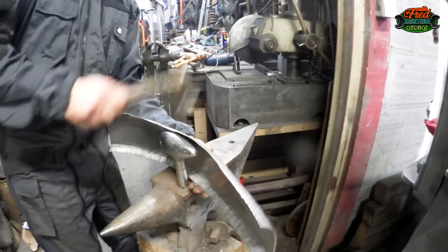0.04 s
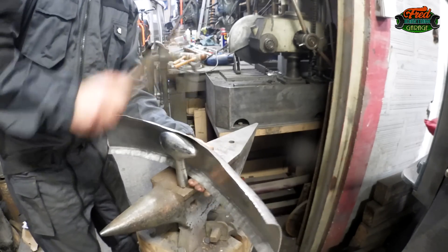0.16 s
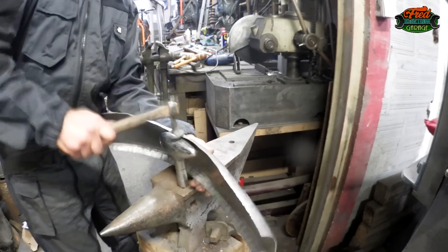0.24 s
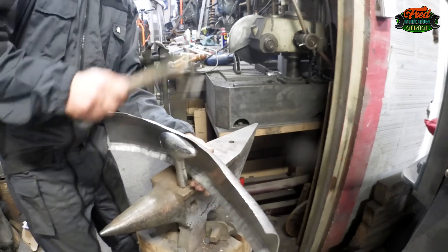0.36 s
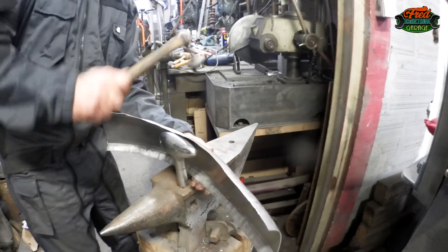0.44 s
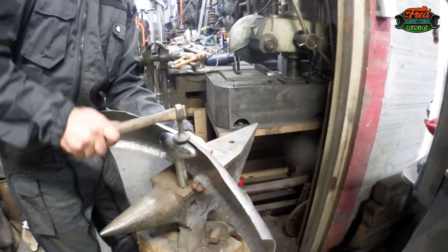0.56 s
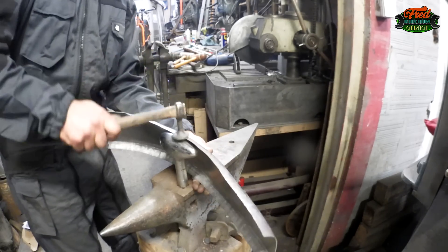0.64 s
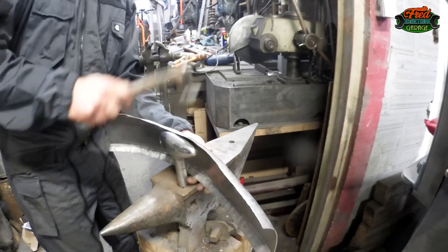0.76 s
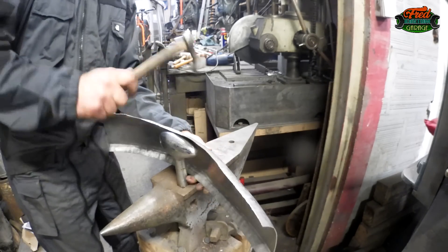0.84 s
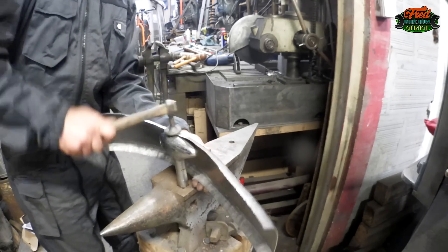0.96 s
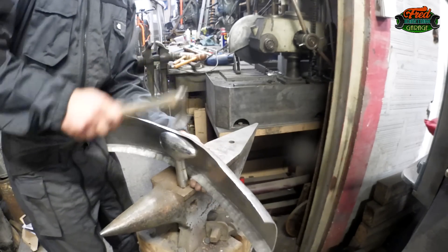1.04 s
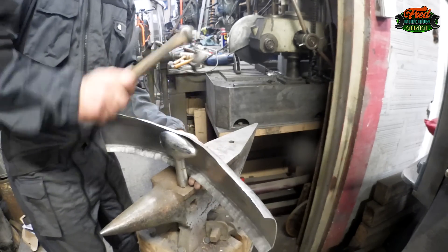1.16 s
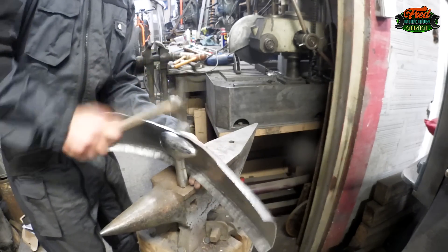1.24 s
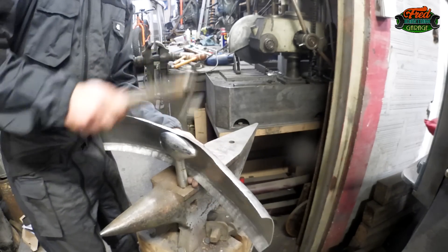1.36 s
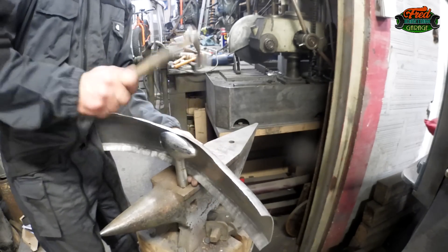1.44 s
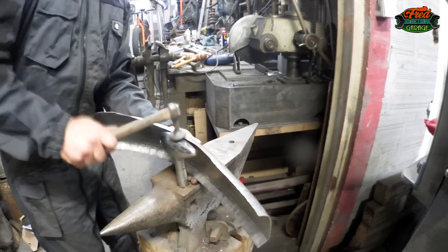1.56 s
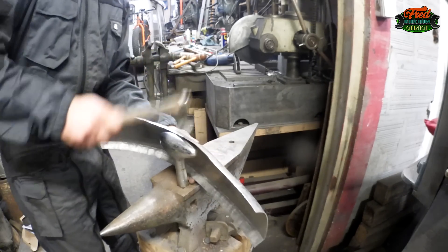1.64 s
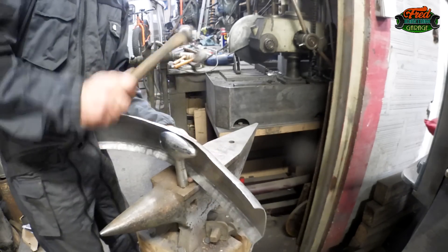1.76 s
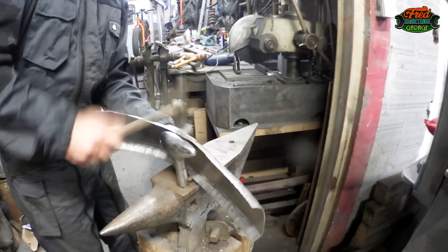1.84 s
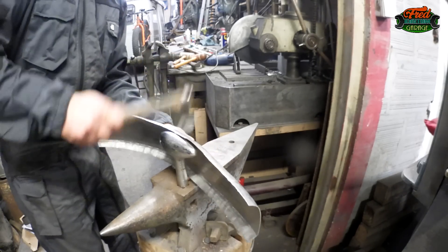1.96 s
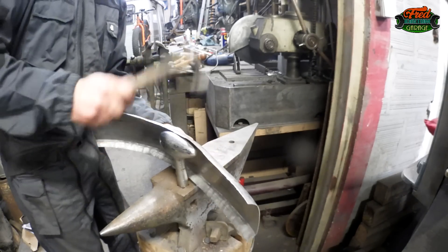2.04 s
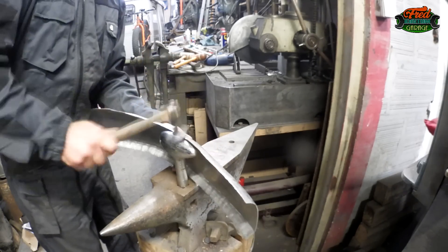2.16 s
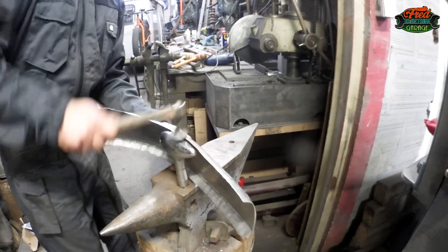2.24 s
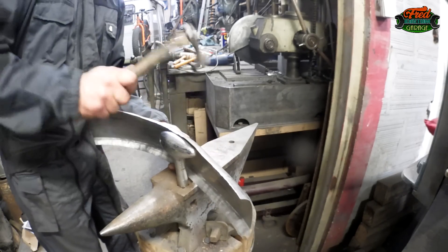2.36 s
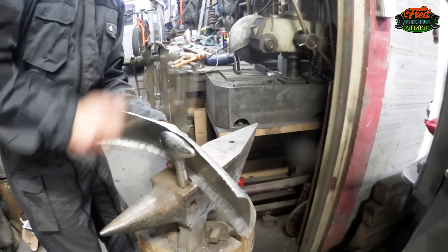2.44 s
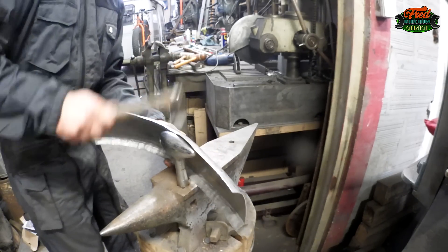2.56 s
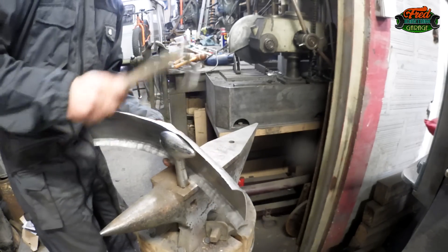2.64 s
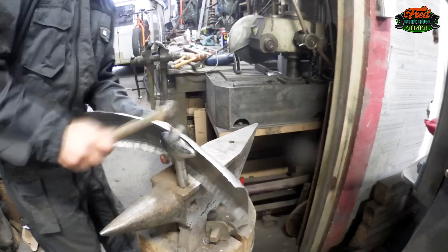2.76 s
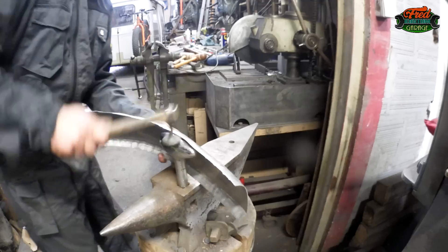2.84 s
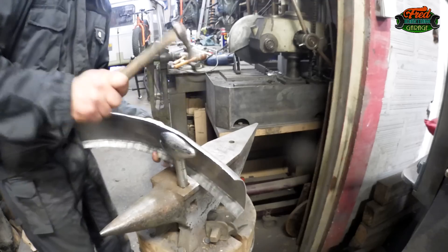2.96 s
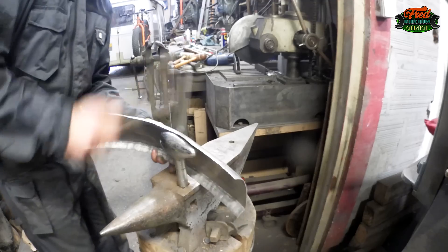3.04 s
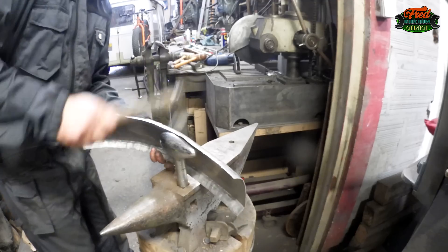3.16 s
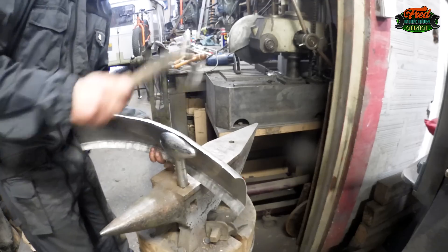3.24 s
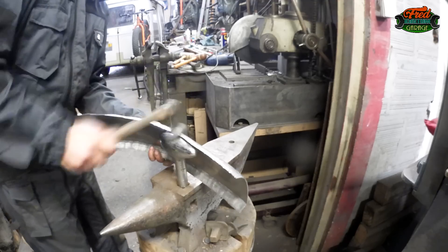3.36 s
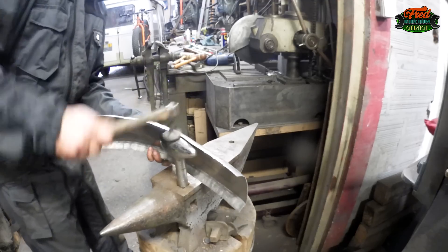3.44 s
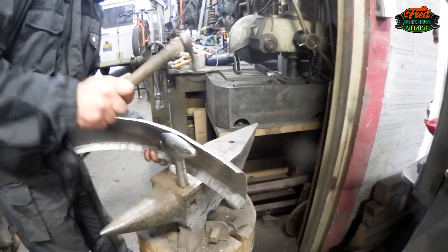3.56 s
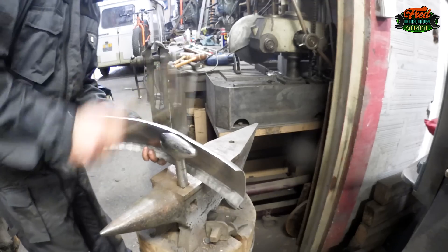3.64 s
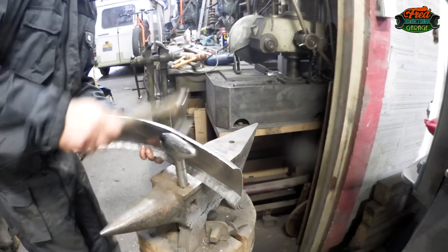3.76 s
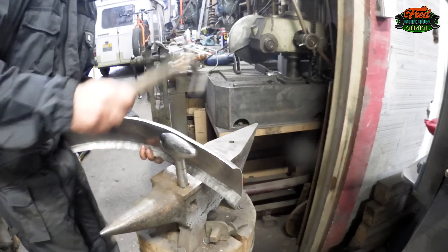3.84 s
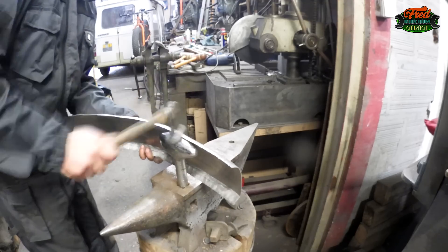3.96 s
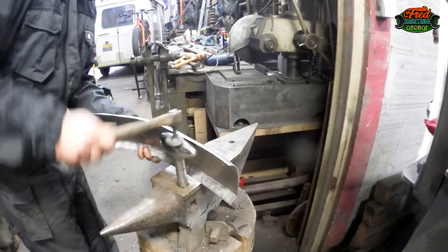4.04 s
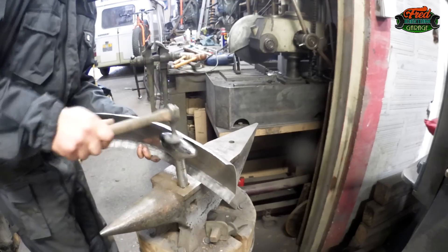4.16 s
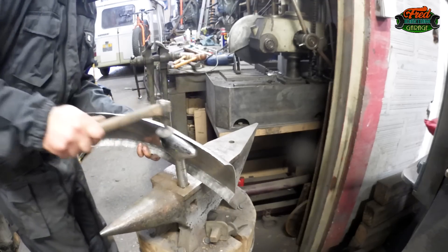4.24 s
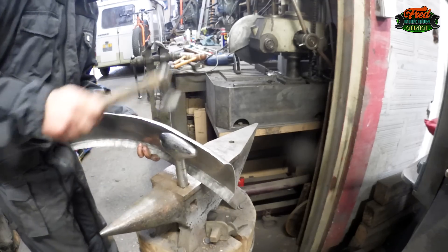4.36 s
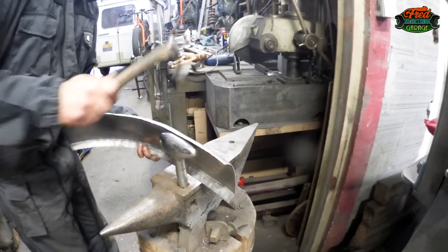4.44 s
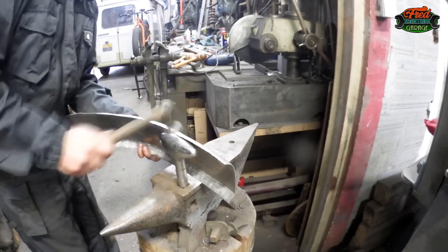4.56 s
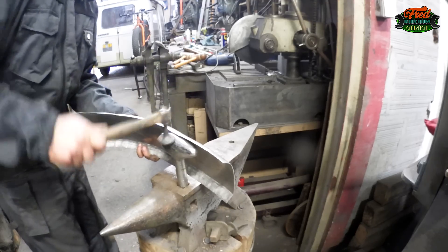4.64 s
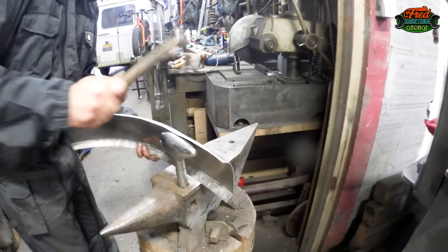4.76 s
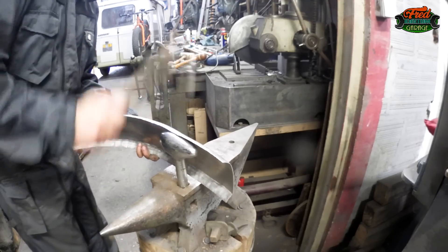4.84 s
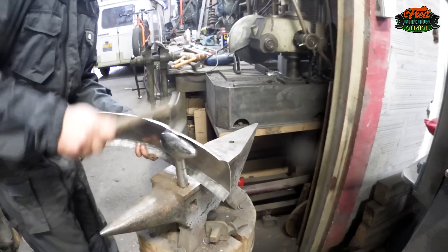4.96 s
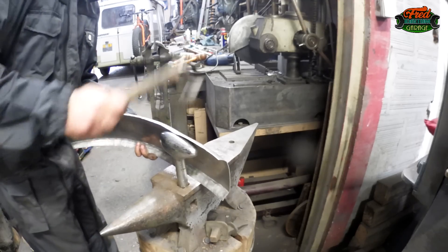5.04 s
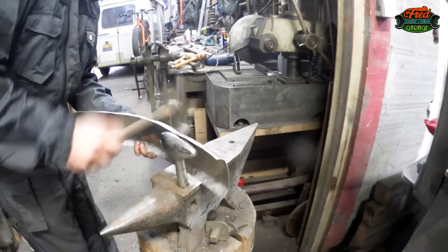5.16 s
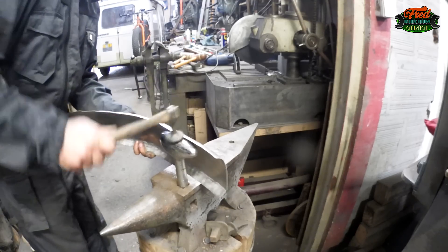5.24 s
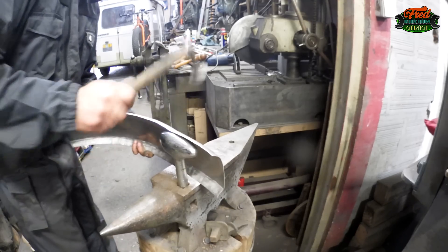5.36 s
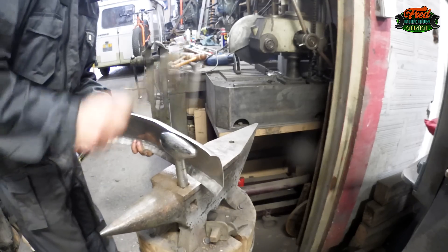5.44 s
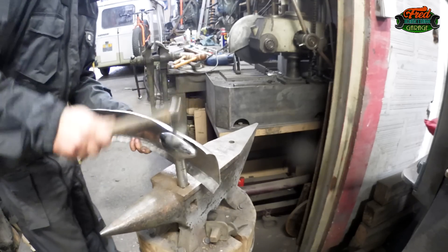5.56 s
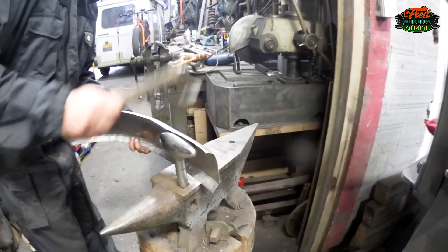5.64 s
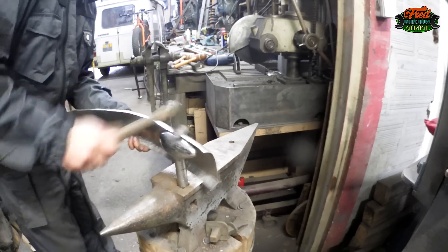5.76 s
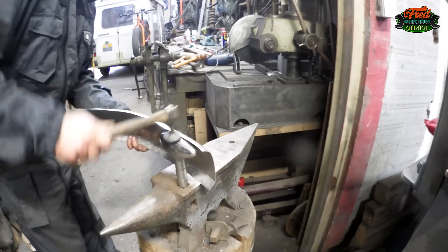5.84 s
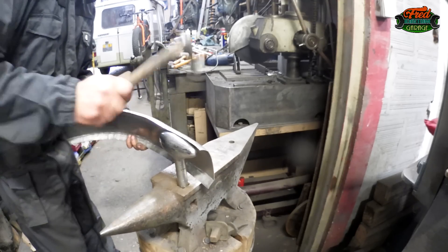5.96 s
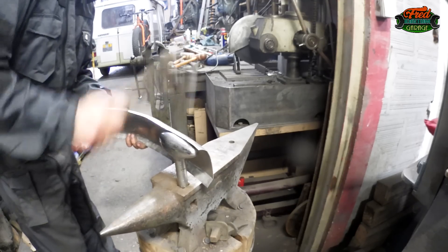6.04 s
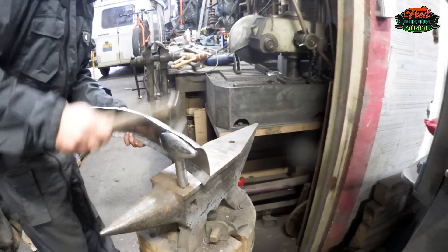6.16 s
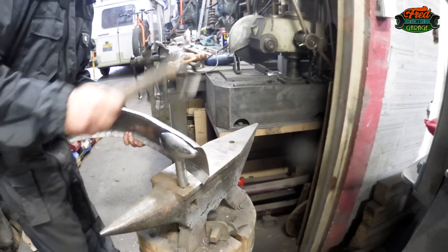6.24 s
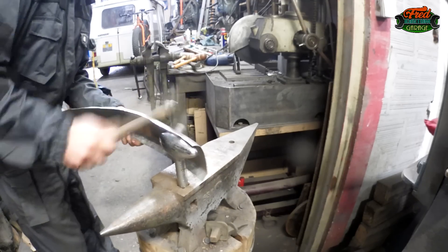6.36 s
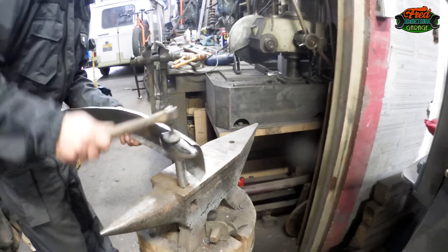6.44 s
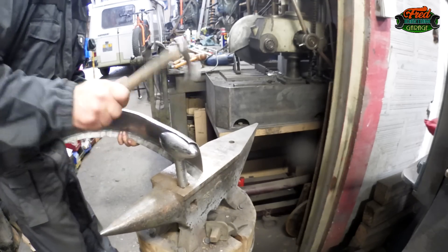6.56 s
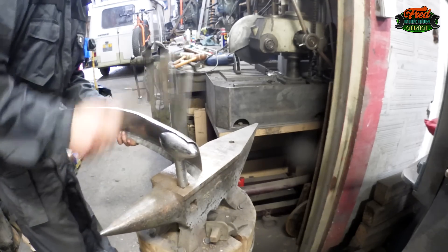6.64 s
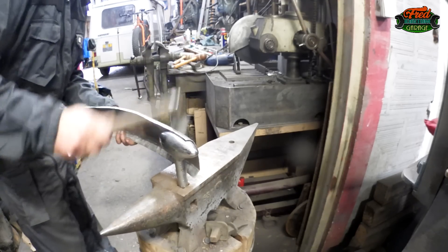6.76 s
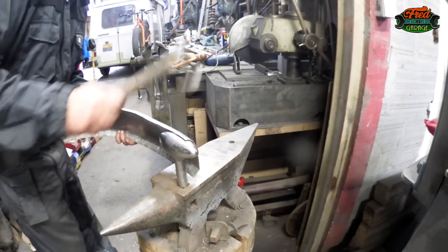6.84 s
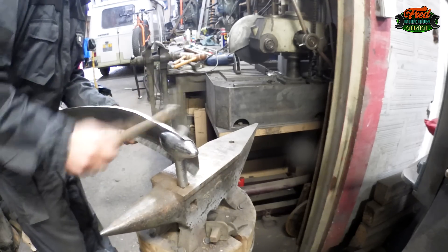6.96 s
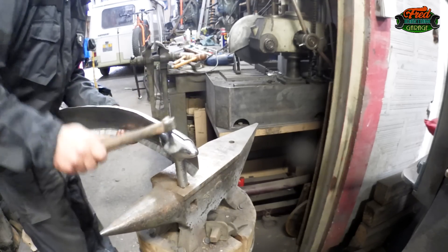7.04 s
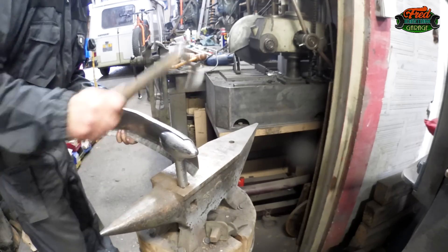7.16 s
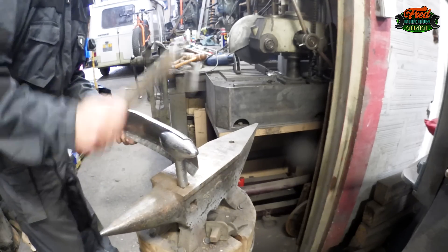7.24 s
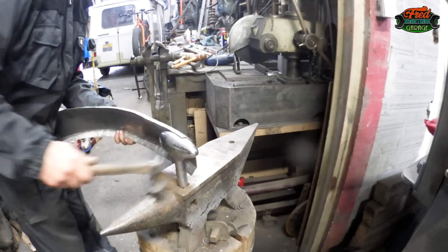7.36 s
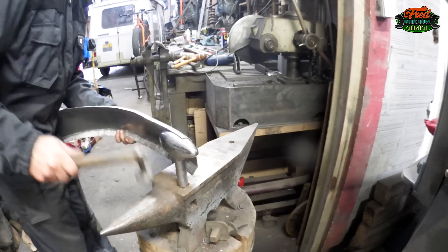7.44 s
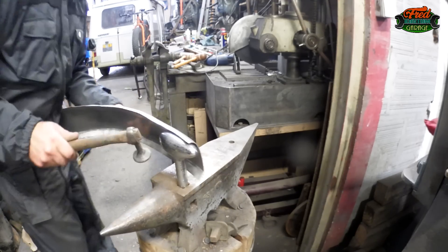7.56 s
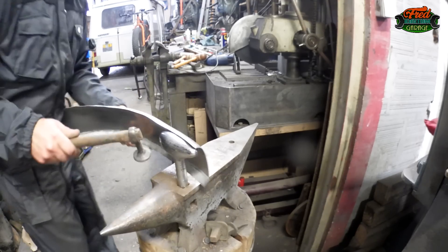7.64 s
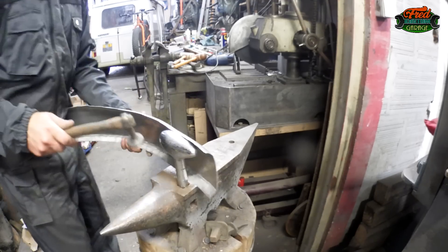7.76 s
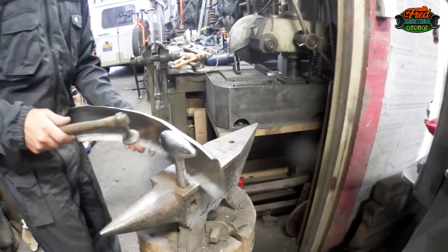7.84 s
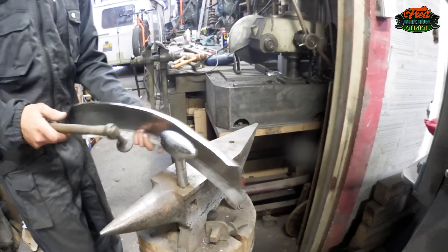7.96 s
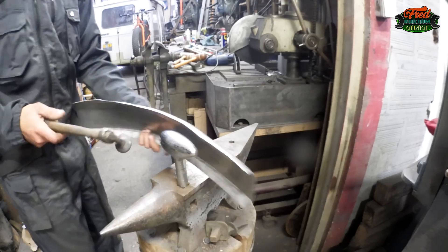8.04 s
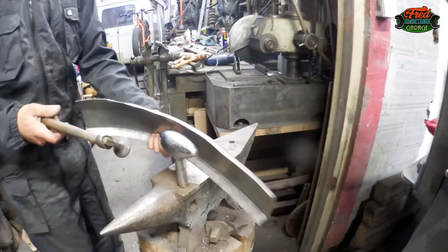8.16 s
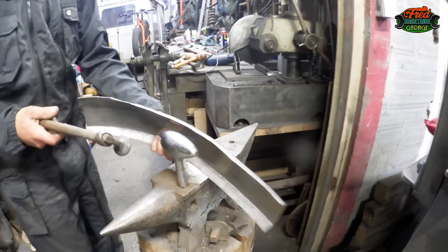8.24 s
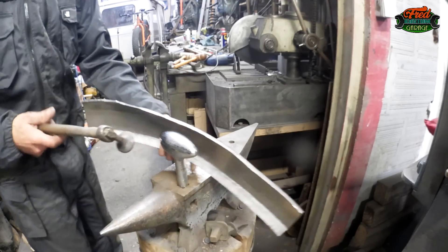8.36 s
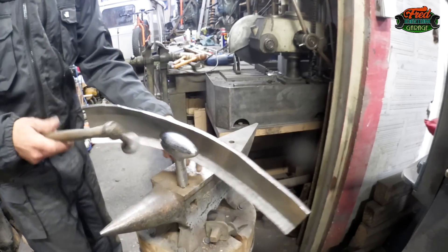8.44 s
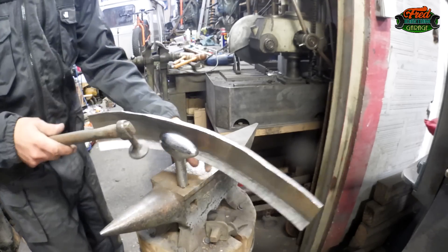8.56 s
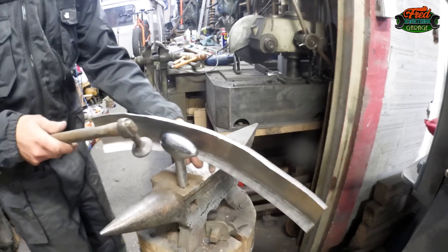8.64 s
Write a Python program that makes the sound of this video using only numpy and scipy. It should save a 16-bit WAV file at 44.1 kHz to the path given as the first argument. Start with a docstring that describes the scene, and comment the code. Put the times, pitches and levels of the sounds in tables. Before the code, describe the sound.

Rapid hammer blows clang on a hand-damped curved steel sheet over an anvil stake, each rattling briefly, then soft knocks and faint scraping at the end.

```python
"""A curved steel panel is hammered over a stake on an anvil, about three blows a second, in a small workshop.
Each blow rings the hand-damped sheet as a crowd of decaying sines, and the sheet chatters back on the stake.
At the end the panel slides over the stake, rung by tiny noise catches, and knocks on it lightly.
Reflections off cluttered walls and faint air noise surround it; the close stereo microphone overloads."""
import sys
import numpy as np
from scipy import signal
from scipy.fft import rfft, irfft
from scipy.io import wavfile

SR = 44100
rng = np.random.default_rng(int(sys.argv[2]) if len(sys.argv) > 2 else 0)


def unload_wav(signal):
    """Save mono or channel-first audio to the path in sys.argv[1] as 16-bit WAV at rate SR, clipped to [-1, 1]."""
    wavfile.write(
        sys.argv[1],
        SR,
        np.round(np.clip(np.atleast_2d(signal).T, -1, 1) * 32767).astype(np.int16),
    )


N = 383669  # samples, 8.7 s
LEAD = SR // 4  # samples of run-up before time zero
RING_TIME = np.arange(SR // 4) / SR  # s, the span of one ring

# the sheet's outstanding modes: f/Hz, relative level/dB
OUTSTANDING_MODES = [(856, -14.5), (1082, -5.5), (1263, -10.5), (1500, -13.5), (1722, -3.5), (1875, -13),
                     (2064, -11), (2252, -9), (2702, -10), (3094, -7), (3250, -8.5), (3777, -0.5),
                     (3963, 1.5), (4264, -7), (4479, -10.5), (4705, -14)]


def undb(db):
    """Decibels to gain."""
    return 10 ** (np.asarray(db) / 20)


def at(points, hz):
    """Read (Hz, value) points on a log-frequency axis."""
    f, value = np.transpose(points)
    return np.interp(np.log(hz + 1e-3), np.log(f), value)


def unit(x):
    """Scale to rms 1."""
    return x / np.sqrt(np.mean(x ** 2))


def decay(t, t60):
    """Exponential fall of 60 dB in t60 seconds."""
    return np.exp(-np.log(1000) * t / t60)


def highpass(x, order, hz):
    """Butterworth filter that removes the sound below hz."""
    return signal.sosfilt(signal.butter(order, hz, "high", fs=SR, output="sos"), x)


def colour(x, points):
    """Causal minimum-phase filter with the given (Hz, dB) response."""
    log_gain = np.log(undb(at(points, np.fft.rfftfreq(2048, 1 / SR))))
    cepstrum = irfft(log_gain)
    # folding the cepstrum forward makes the response causal
    cepstrum[1:1024] *= 2
    cepstrum[1025:] = 0
    response = irfft(np.exp(rfft(cepstrum)))
    return signal.fftconvolve(x, response[None], axes=1)[:, :x.shape[1]]


def add(track, s, sound):
    """Mix a sound into a track that starts LEAD samples early."""
    i = LEAD + int(s * SR)
    part = sound[:, :track.shape[1] - i]
    track[:, i:i + part.shape[1]] += part


def rings(hz, t60):
    """One decaying sine per mode."""
    hz, t60, t = (np.float32(v) for v in (hz, t60, RING_TIME))
    sines = np.sin(np.float32(2 * np.pi) * hz[:, None] * t)
    return sines * np.exp(np.float32(-np.log(1000)) * t / t60[:, None])


def strike(shapes, gains, spread):
    """Every contact drives the modes with its own strengths and signs, a little different towards each ear."""
    common, side = rng.standard_normal((2, len(gains)))
    weights = gains * (common + spread * side * np.array([[1], [-1]]))
    return np.float32(weights) @ shapes


def panel(lowest_hz=170):
    """Blows, chatter and handling all ring the same sheet, which is too thin to radiate much bass."""
    modes = sheet_modes()
    return highpass(hammering(*modes) + handling(*modes), 2, lowest_hz)


def sheet_modes(count=1000, t60_1k=0.14, damping_slope=0.17, modes_db=-17):
    """Pitches, strengths and rings of the sheet; a plate's modes lie evenly dense in frequency."""
    # how strongly the crowded modes sound: f/Hz, relative level/dB
    crowd_levels = [(150, -23.5), (300, -12.5), (600, -7.5), (850, -1.5), (1100, 3), (1500, 3.5),
                    (2300, 10), (2900, 6), (3150, 11), (3550, 5), (4100, 12.5), (5000, 5), (6500, -0.5),
                    (8500, -10.5)]
    crowd_hz = 120 + 8300 * (np.arange(count) + rng.random(count)) / count
    crowd = undb(at(crowd_levels, crowd_hz))
    mode_hz, mode_db = np.transpose(OUTSTANDING_MODES)
    hz = np.r_[crowd_hz, mode_hz]
    gains = np.r_[crowd / np.linalg.norm(crowd), undb(mode_db + modes_db)]
    # the holding hand damps every mode, the high ones a little faster
    t60 = t60_1k * (hz / 1000) ** -damping_slope
    return hz, gains, rings(hz, t60)


def hammering(hz, gains, shapes, spread=0.38, blow_db=.5, grip_shift=.012):
    """Each blow and its bounces ring the sheet with the colour of the struck spot."""
    # hammer blows: t/s, relative force level/dB, relative hollow body level/dB, relative bright clang level/dB,
    # struck spot f/Hz, wait until the sheet slaps back on the stake t/s, slap level against its blow/dB
    blows = [(-.05, -0.5, 5, -1.5, 1195, 0.029, -9), (0.2493, -1.5, 3.5, 1.5, 1320, 0.035, -7),
             (0.5456, 1.5, 0, -0.5, 1098, 0.034, -5.5), (.9613, 0, 5, 1.5, 1043, 0.031, -3),
             (1.279, 1.6, 0, 2.5, 1104, 0.028, -8), (1.5794, -3, -0.7, 2.5, 1565, 0.033, -5),
             (1.884, -1, 1.3, 1, 1267, 0.028, -13), (2.1954, 1, 1.1, 5.5, 956, 0.023, -11.5),
             (2.5006, 3, 1, 1.5, 1068, 0.023, -9), (2.8044, 2, 0, 3, 1615, 0.033, -12.5),
             (3.1015, 2.6, -3.2, -0.9, 1491, 0.022, -8.5), (3.407, 0.8, -1, 2, 1500, 0.023, -15.5),
             (3.7032, -1.7, -1.7, -0.5, 1584, 0.023, -4.5), (4.0039, 0.5, 0.5, 1.5, 1142, .026, -9.5),
             (4.6072, 1.5, -1.9, -1.5, 1487, 0.032, -9), (4.9225, 1.1, -6, -5.5, 1330, 0.015, -12.5),
             (5.2213, -0.26, -0.5, -0.8, 1093, .025, -11), (5.5194, -0.5, -1.1, 2.5, 1064, 0.026, -11.5),
             (5.8131, 0.2, -0.2, -1.1, 1390, 0.028, -8), (6.1179, 0.3, -1, 0.5, 1160, .012, -21),
             (6.4186, .7, 0, -1.5, 1121, 0.0087, -7), (6.7145, 2, -1.5, -1.8, 1410, 0.013, -15.5),
             (7.019, -2.5, 0.2, -3.8, 1495, .011, -3.5), (7.3367, -6.5, 0, -3, 1046, 0.027, -10)]
    spot_db, spot_t60_s = -16, 0.086  # the struck spot's own ring
    out = np.zeros((2, LEAD + N))
    chance = rng.standard_normal((len(blows), 2))
    for blow, (grip, jitter) in zip(blows, chance):
        s, force_db, body_db, clang_db, spot_hz, slap_s, slap_db = blow
        spot = undb(spot_db) * rings([spot_hz], [spot_t60_s])
        tone = spot_tone(hz, body_db, clang_db)
        # grip and bending retune the sheet a little from blow to blow
        retuned = RING_TIME * (1 + grip_shift * grip)
        for delay, db in contacts(slap_s, slap_db, jitter):
            ears = strike(shapes, gains * tone, spread)
            ring = np.array([np.interp(retuned, RING_TIME, ear) for ear in ears])
            add(out, s + delay, undb(blow_db + force_db + db) * (ring + spot + crack()))
    return out


def spot_tone(hz, body_db, clang_db, patchy_db=2.5, uneven_db=1.5, count=48):
    """The hammer lands near the nodes of some groups of modes and the crests of others."""
    db = at([(1200, body_db), (2000, 0), (3400, 0), (4200, clang_db), (5500, 0)], hz)
    patches = np.interp(hz, np.linspace(hz.min(), hz.max(), count), rng.standard_normal(count))
    unevenness_db = patchy_db * patches + uneven_db * rng.standard_normal(len(hz))
    return undb(db) * unit(undb(unevenness_db))


def contacts(slap_s, slap_db, jitter, count=3):
    """One blow as (delay s, dB): the hammer, a rattle under its face, and the sheet bouncing on the stake."""
    rattle_s, rattle_scatter_s, rattle_db = .011, .002, -10
    # after the first slap each bounce comes sooner and weaker
    gap_ratio, loss_db = .6, -9.5
    bounce = np.arange(count)
    delays = slap_s * np.cumsum(gap_ratio ** bounce)
    rattle = (abs(rattle_s + rattle_scatter_s * jitter), rattle_db)
    return [(0, 0), rattle, *zip(delays, slap_db + loss_db * bounce)]


def crack(level_db=-27, t60=0.049):
    """Steel meeting steel spits a brief burst of treble."""
    burst = highpass(rng.standard_normal(len(RING_TIME)), 2, 7000)
    return undb(level_db) * burst * decay(RING_TIME, t60)


def workshop(x, room_db=-14, build_s=0.0096):
    """Dense reflections off cluttered walls build up quickly; the treble dies first."""
    # colour of the wall reflections: f/Hz, relative level/dB
    wall_colour = [(100, -12.5), (400, -2), (1200, -3), (4000, -5), (7000, 2), (10000, -2.5)]
    # how long the reflections last: f/Hz, t60/s
    wall_t60 = [(150, 0.53), (1000, 0.52), (2500, 0.59), (5000, 0.5), (10000, 0.24)]
    t = np.arange(SR) / SR
    hz = np.fft.rfftfreq(SR, 1 / SR)
    noise, tail = rfft(rng.standard_normal((2, SR))), 0
    centres = [f for f, _ in wall_t60]
    # overlapping bands, each dying at its own rate
    for (_, t60), own in zip(wall_t60, np.eye(len(centres))):
        band = at(list(zip(centres, own)), hz)
        tail = tail + irfft(noise * band, SR) * decay(t, t60)
    tail = unit(tail * (1 - np.exp(-t / build_s))) / np.sqrt(SR)
    reflections = signal.fftconvolve(x, colour(tail, wall_colour), axes=1)[:, :x.shape[1]]
    return undb(room_db) * reflections


def background(width=0.66, level_db=-72):
    """Faint steady air noise in the shop, partly different at each ear."""
    # spectrum of the air noise: f/Hz, relative level per Hz/dB
    air = [(40, -12), (100, 3), (200, 4), (400, 4.5), (700, -1.5), (1500, -6), (4000, -8), (7500, -21.5),
           (15000, -25.5)]
    mid, side = rng.standard_normal((2, N))
    stereo = mid + width * side * np.array([[1], [-1]])
    return undb(level_db) * unit(colour(stereo, air))


def sliding(response, catches_per_s=2500):
    """Tiny catches of uneven size ring the sheet as it is dragged."""
    # the panel sliding over the stake: t/s, relative level/dB
    slide = [(7.45, -43.5), (7.6, -53.5), (7.8, -49), (7.96, -62), (8.18, -52.5), (8.22, -78), (8.56, -78),
             (8.62, -66.5), (8.7, -63.5)]
    t = np.arange(-LEAD, N) / SR
    catches = rng.standard_normal(len(t)) * (rng.random(len(t)) < catches_per_s / SR)
    rub = signal.fftconvolve(catches[None], response, axes=1)[:, :len(t)]
    level_db = np.interp(t, *np.transpose(slide), left=-np.inf)  # silent before the slide
    return unit(rub) * undb(level_db)


def handling(hz, gains, shapes, spread=0.38):
    """The loosely held panel bumps and slides on the stake in soft contacts; its outstanding modes ring longer."""
    # light bumps of the panel as it is moved: t/s, relative level/dB, brightness/dB per octave
    bumps = [(7.683, -45, -6), (7.709, -33, -5.5), (7.819, -41.5, -4.5), (7.830, -47.5, -4.5),
             (7.885, -56, 2), (7.909, -54, 0), (8.153, -49.5, -3.5), (8.181, -52, -2.5), (8.591, -64, -2)]
    # slow, soft contacts reshape the strength of the modes: f/Hz, relative level/dB
    softness = [(200, -5), (400, -8), (650, 3), (1100, 6), (2300, 9.5), (4000, 5), (7000, 5)]
    loose_db, loose_t60_s = -9, 0.23  # the outstanding modes of the loosely held sheet
    mode_hz, mode_db = np.transpose(OUTSTANDING_MODES)
    soft = np.r_[gains * undb(at(softness, hz)), undb(mode_db + loose_db)]
    hz = np.r_[hz, mode_hz]
    shapes = np.vstack([shapes, rings(mode_hz, [loose_t60_s])])
    out = np.zeros((2, LEAD + N))
    for s, db, tilt_db in bumps:
        # the tilt pivots at 1500 Hz and levels off below 600 Hz
        tilt = undb(tilt_db * np.log2(np.maximum(hz, 600) / 1500))
        add(out, s, undb(db) * (strike(shapes, soft * tilt, spread) + crack()))
    return out + sliding(strike(shapes, soft, spread))


def scene(left_db=-2):
    """The left microphone port hears the sheet slightly earlier and weaker than the right."""
    left, right = panel()
    direct = np.array([undb(left_db) * left, np.roll(right, 1)])  # right one sample later
    return (direct + workshop(direct))[:, LEAD:] + background()


def record(dry, ceiling=0.51, knee=6, lopsided=0.099, port_lag_us=12, top_hz=14600):
    """Blows overload the close input, which adds a treble spit and, being lopsided, a small thump."""
    # microphone response: f/Hz, relative level/dB
    mic = [(30, -3.5), (130, -11), (400, -4.5), (4000, -2.5), (8000, -2.5), (12000, 3), (15000, 5)]
    # left microphone port against the right: f/Hz, relative level/dB
    left_port = [(40, -4.5), (130, -2.5), (500, -1.5), (1200, -2.5), (4000, -0.5), (8000, -1.5),
                 (14000, -2)]
    limit = ceiling * (1 + lopsided * np.sign(dry))
    clipped = dry / (1 + np.abs(dry / limit) ** knee) ** (1 / knee)
    heard = colour(clipped, mic)
    # the two ports differ a little in colour and delay
    taps = np.arange(-8, 9)
    late = np.sinc(taps - port_lag_us * SR / 1e6) * np.hanning(len(taps))
    left = colour(heard[:1], left_port)[0]
    right = np.convolve(heard[1], late, "same")
    heard = highpass(np.array([left, right]), 1, 25)
    # steep cut above the top of the recorded band
    return signal.sosfilt(signal.ellip(8, .2, 70, top_hz, fs=SR, output="sos"), heard)


dry = scene()
out = record(dry)
unload_wav(out)
```